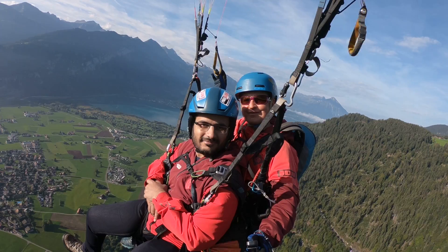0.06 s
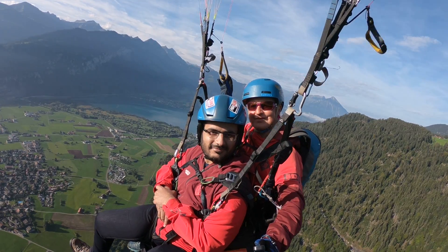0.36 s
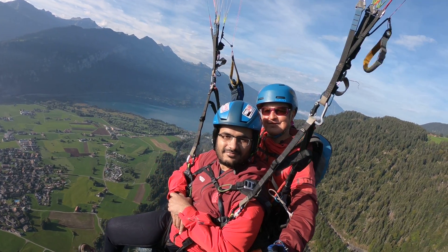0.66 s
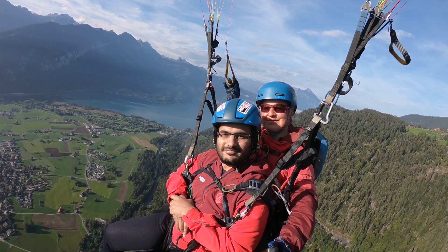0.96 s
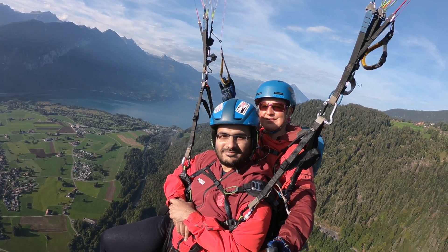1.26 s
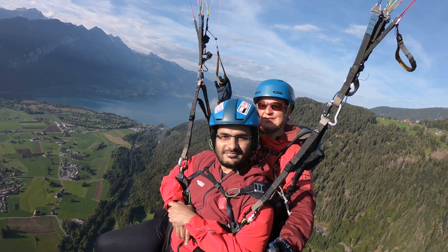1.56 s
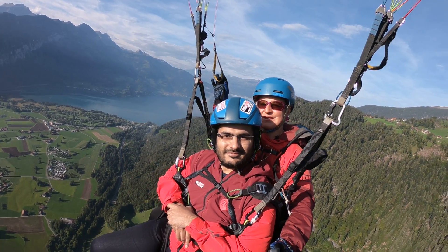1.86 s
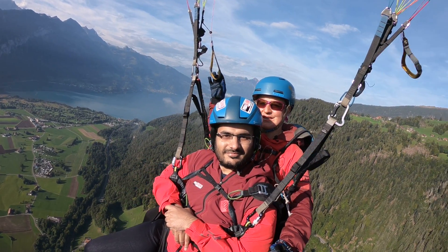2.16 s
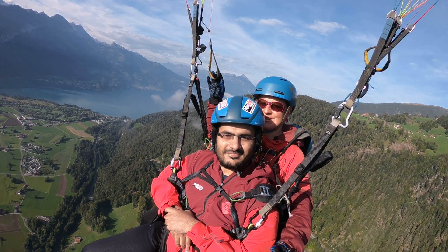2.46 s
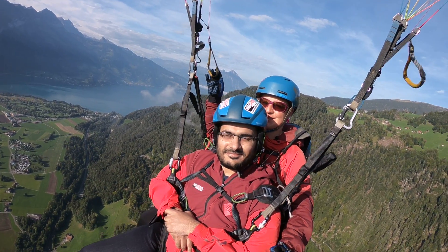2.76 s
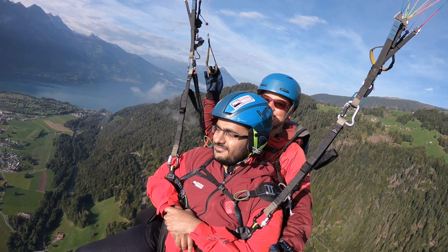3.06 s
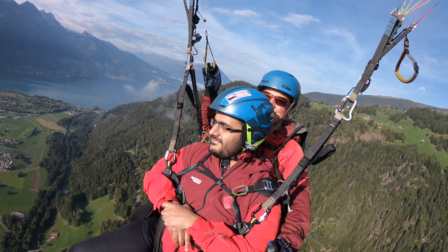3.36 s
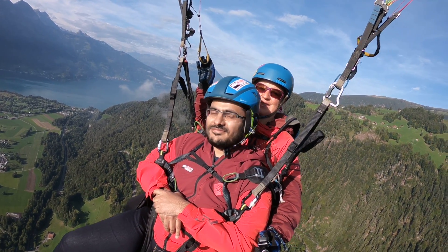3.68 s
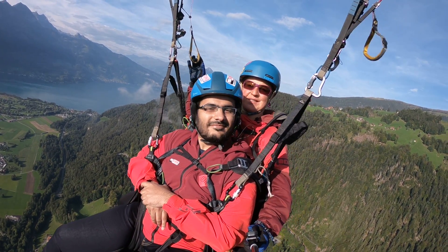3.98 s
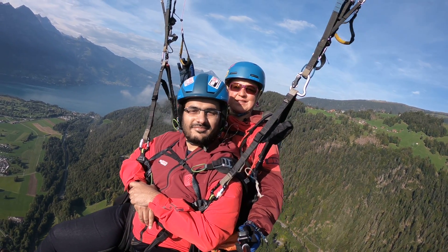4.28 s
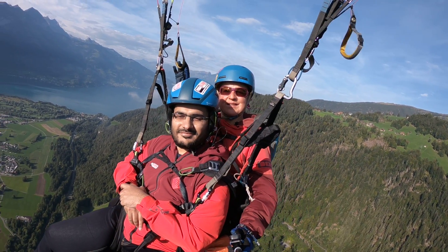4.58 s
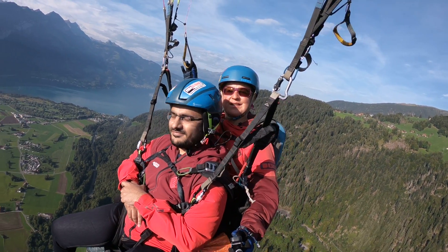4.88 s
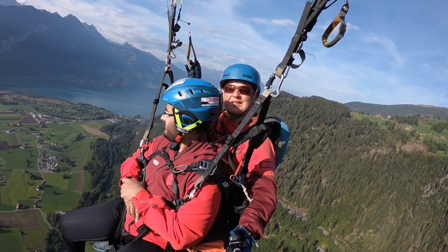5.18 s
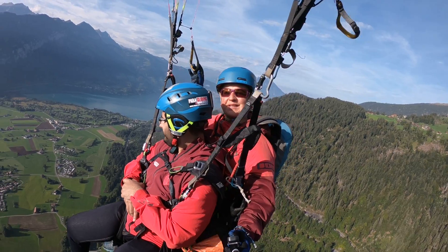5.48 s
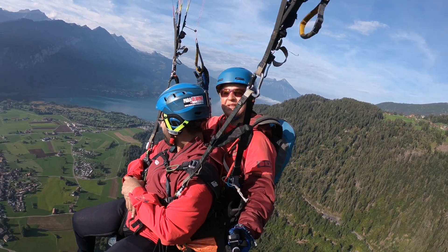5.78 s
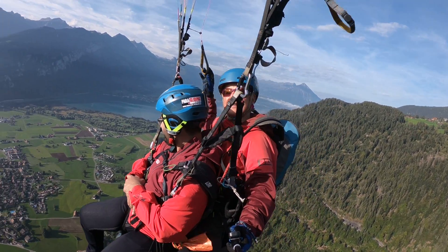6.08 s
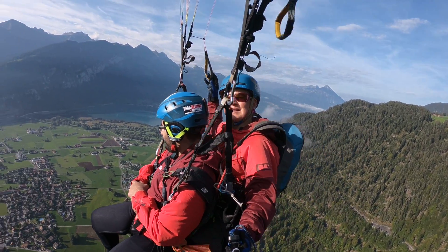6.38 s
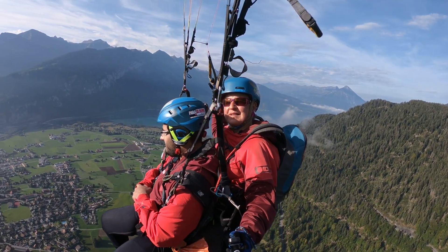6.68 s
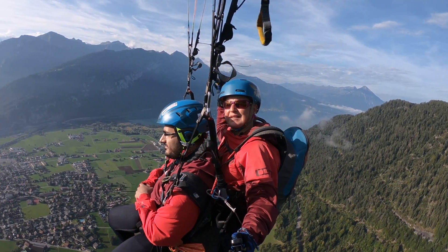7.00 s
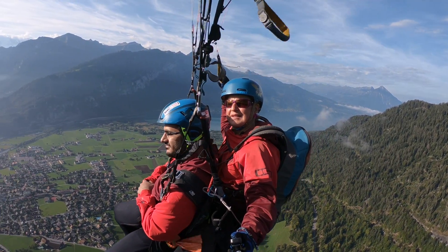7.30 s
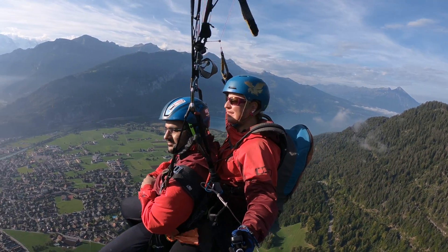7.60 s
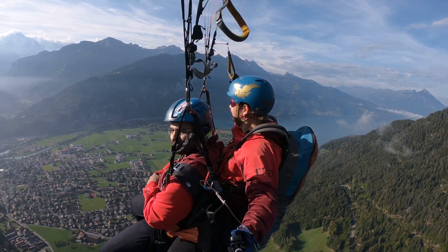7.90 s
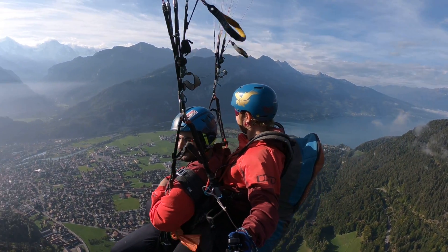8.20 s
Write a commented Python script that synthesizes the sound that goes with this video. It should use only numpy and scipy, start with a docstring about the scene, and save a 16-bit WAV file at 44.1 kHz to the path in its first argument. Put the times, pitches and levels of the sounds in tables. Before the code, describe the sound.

Wind fades in quickly and rumbles right on the microphone during a paraglider flight, with uneven thumps, little pops and a steady hiss behind. A few dry buckle ticks come near the start. Toward the end the deep buffeting weakens and gives way to a tearing, fizzing gust, mixed with short cloth scuffs and sharp fabric snaps.

```python
"""Low, buffeting wind fades in on the microphone of a camera held out from a paraglider, high above a valley.
Large eddies thump the housing and small ones flutter and pop at the port, over an even rush of air.
Harness buckles tick early on, and taut fabric gives the odd snap. Near six seconds the camera swings
round: a sleeve and the straps rub and snap, and the stream tears across the port in a bright,
crackling gust."""
import sys
import numpy as np
from scipy import signal
from scipy.fft import rfft, irfft, next_fast_len
from scipy.io import wavfile
from scipy.ndimage import uniform_filter1d

SR = 44100
rng = np.random.default_rng(int(sys.argv[2]) if len(sys.argv) > 2 else 0)


def pcm_store(signal):
    """Save signal as 16-bit PCM."""
    levels = np.round(np.clip(np.atleast_2d(signal), -1, 1) * 32767)
    wavfile.write(sys.argv[1], SR, levels.astype(np.int16).T)


N = 372644
TIME, BINS = np.arange(N) / SR, np.fft.rfftfreq(next_fast_len(N), 1 / SR)
TURN_S, TURN_LENGTH_S = 6.0, 0.34  # the camera swings round


def gain_of(db):
    """Decibels to amplitude."""
    return 10 ** (np.asarray(db) / 20)


def unit_rms(x):
    """Scales to rms 1."""
    return x / np.sqrt(np.mean(x ** 2) + 1e-20)


def follow(rows):
    """Each column of an automation curve, sample by sample."""
    s, *columns = np.transpose(rows)
    return [np.interp(TIME, s, column) for column in columns]


def coloured(x, colour):
    """Puts x through an EQ curve, at rms 1."""
    hz, db = np.transpose(colour)
    size = next_fast_len(N)
    eq = gain_of(np.interp(np.log(BINS + 1), np.log(hz), db))
    return unit_rms(irfft(rfft(x, size) * eq, size)[:N])


def wander(rate_hz, size=16384):
    """Random drift of rms 1, mostly slower than the rate, with its extremes rounded off."""
    hz = np.fft.rfftfreq(size, TIME[-1] / size)
    band = hz / (hz + 3) / (1 + (hz / rate_hz) ** 2)
    drift = unit_rms(irfft(rfft(rng.standard_normal(size)) * band))
    return np.interp(TIME, np.linspace(0, TIME[-1], size), unit_rms(np.tanh(drift / 2)))


def turbulence(colour, surge_db):
    """Random pressure that comes in surges, shaped by an EQ curve."""
    return coloured(rng.standard_normal(N) * gain_of(surge_db), colour)


def swell(s, half_s):
    """The samples around a moment, and a bell that peaks there."""
    near = slice(*np.searchsorted(TIME, [s - .1, s + .1]))
    return near, np.exp(-((TIME[near] - s) / half_s) ** 2)


def ride_level(x, level_db, buffet_power):
    """Keeps the quick lumps of x around a level, and gives each buffet its full strength."""
    slow_power = uniform_filter1d(uniform_filter1d(x ** 2, size=5000), size=3500) + 1e-12
    quick_power = uniform_filter1d(uniform_filter1d(x ** 2, size=1100), size=750) + 1e-12
    return x * np.sqrt(gain_of(level_db) ** 2 / slow_power + buffet_power / quick_power)


# throb of vortices behind the camera and its pole: t/s, f/Hz, share of the rumble's power/0-1
SHEDDING = [(.4, 165, 0.2), (1.4, 68, 0.05), (2.1, 120, 0.2), (2.65, 121.9, 0.25), (3.0, 61.92, 0.34),
            (3.9, 55.99, 0.25), (4.35, 100, 0.6), (4.75, 100, 0.22), (5.4, 148.1, 0.13), (6.15, 104, 0.56),
            (6.55, 122, 0.26), (6.8, 115, .5), (6.9, 102, .75), (7.18, 95.8, .8), (7.3, 111.9, 0.01),
            (7.8, 250, 0), (7.9, 280, .35), (8.25, 280.4, 0.22), (8.45, 301, 0)]


def vortex_throb(width_hz=20):
    """Vortices peel off almost regularly: narrow noise at the shedding rate, and its share of power."""
    hz, share = follow(SHEDDING)
    pole = np.exp(-2 * np.pi * width_hz / SR)
    noise = rng.standard_normal(N) + 1j * rng.standard_normal(N)
    drift = signal.lfilter([1], np.poly([pole, pole]), noise)
    carrier = np.exp(2j * np.pi * np.cumsum(hz) / SR)
    return unit_rms((drift * carrier).real), np.clip(share, 0, 1)


# faders for three sizes of eddy: t/s, rumble/dB, flutter/dB, swirl/dB
EDDY_LEVELS = [(0.33, -30.3, -32.5, -46.5), (0.9, -28, -35, -43), (1.4, -24, -35, -47),
               (1.9, -24, -39.5, -49), (2.9, -27, -39.5, -52.3), (3.45, -27, -41, -54),
               (3.65, -29, -38.5, -54), (4.4, -29, -43, -51), (4.6, -24.5, -38.5, -49.5),
               (5.3, -30.5, -34, -42.5), (5.7, -33.5, -34, -44.5), (5.95, -29.5, -35, -43),
               (6.15, -28, -34.5, -42.5), (6.4, -33, -39, -46), (6.7, -35.5, -37, -44.5),
               (6.92, -35.5, -43.5, -46.5), (7.12, -36, -43.5, -47), (7.25, -36, -40, -47.5),
               (7.45, -37.5, -41, -50), (7.62, -39, -45, -50), (7.8, -37.5, -44.5, -50.5),
               (7.87, -39, -39.5, -46), (8.05, -37, -38.3, -44.5), (8.25, -39, -41, -46),
               (8.45, -42, -47, -48.5)]
# single large eddies thump the housing: t/s, rumble/dB, flutter/dB
BUFFETS = [(.716, -23.5, -35), (.849, -29, -30), (.918, -29, -45), (1.133, -23, -43), (1.198, -22, -41),
           (1.259, -21, -35), (1.391, -29, -39), (1.438, -36, -31), (1.474, -17.5, -40), (1.6, -22.5, -36),
           (1.658, -21.5, -42), (1.777, -19, -37), (1.852, -22, -38), (1.94, -30, -31.5), (1.976, -21, -41),
           (2.022, -21, -36), (2.119, -20, -42), (2.196, -27, -31), (2.281, -19.5, -38), (2.348, -31, -42),
           (2.388, -21.5, -36), (2.446, -18.5, -37), (2.557, -23.5, -34), (2.6, -25, -39),
           (2.652, -19, -29.5), (2.672, -23, -26), (2.717, -26, -38), (2.761, -24, -48),
           (2.832, -27, -32.5), (2.874, -27, -48), (2.946, -20.5, -41), (2.996, -21.5, -32),
           (3.063, -24, -48), (3.119, -26.5, -37), (3.213, -21, -43), (3.269, -24, -44), (3.306, -25, -39),
           (3.378, -25, -34.5), (3.42, -29, -30.5), (3.455, -22, -29.5), (3.521, -20.5, -36),
           (3.72, -24.5, -31.5), (3.79, -39, -31.5), (3.884, -24, -32.5), (3.973, -28.5, -37),
           (4.156, -27.5, -48), (4.209, -24, -44), (4.254, -29, -47), (4.33, -32, -31.5),
           (4.527, -20.5, -40), (4.585, -23, -37), (4.789, -28.5, -38), (4.932, -23.5, -45),
           (4.98, -30.5, -30.5), (5.125, -43, -28), (6.197, -28, -28), (6.52, -31, -39), (6.595, -31, -42),
           (6.785, -28, -36), (6.895, -29, -48), (6.92, -26.5, -52), (6.965, -29.5, -52),
           (7.09, -30.5, -52), (7.14, -31, -52), (7.172, -28.5, -50), (7.87, -36, -40)]
# the air falls slack between buffets: t/s, dip/dB
LULLS = [(1.353, -3), (1.412, -6), (2.088, -4), (2.167, -6), (2.259, -9), (2.49, -7), (2.74, -5), (2.8, -6),
         (2.895, -5), (2.92, -4), (3.097, -4), (3.187, -7.5), (3.33, -9), (3.6, -5.5), (3.837, -7),
         (4.105, -3), (4.178, -8), (4.373, -6.5), (4.45, -2), (4.505, -7), (6.745, -2), (7.005, -2),
         (7.045, 0), (7.21, -4)]
# deep body of the large eddies: f/Hz, level/dB
RUMBLE_EQ = [(10, -18), (25, -10.5), (45, -4), (60, -0.5), (78, -2.5), (102, -1), (135, -2.5), (180, -7),
             (260, -15), (500, -39), (1200, -85)]
# low-mid flap of the small eddies: f/Hz, level/dB
FLUTTER_EQ = [(60, -24.5), (155, -4), (230, -2), (305, 0.5), (370, -6), (480, -13.5), (620, -17),
              (850, -30), (1500, -46), (4000, -81.5)]


def buffeting(surge, rumble_trim_db=1.27, flutter_trim_db=1.86):
    """Large eddies shake the housing, with thumps and lulls; the small ones they shed flutter along."""
    rumble_db, flutter_db, _ = follow(EDDY_LEVELS)
    slack_db, thuds, flaps = np.zeros((3, N))
    for s, dip_db in LULLS:
        near, bell = swell(s, half_s=.011)
        slack_db[near] += dip_db * bell
    for s, thud_db, flap_db in BUFFETS:
        near, bell = swell(s, half_s=.015)
        thuds[near] += bell * gain_of(thud_db) ** 2
        flaps[near] += bell * gain_of(flap_db) ** 2
    vortices, share = vortex_throb()
    throb = unit_rms(vortices * gain_of(1.5 * surge))
    rumble = np.sqrt(1 - share) * turbulence(RUMBLE_EQ, surge_db=2 * surge) + np.sqrt(share) * throb
    flutter = turbulence(FLUTTER_EQ, surge_db=1.5 * surge)
    return (ride_level(rumble, rumble_db + rumble_trim_db + slack_db, thuds)
            + ride_level(flutter, flutter_db + flutter_trim_db + slack_db, flaps))


# midrange sputter at the port: f/Hz, level/dB
SWIRL_EQ = [(200, -18.5), (420, 1), (560, -1.5), (720, -4), (880, -8), (1250, -13.5), (1650, -23),
            (2300, -23), (4000, -36.5), (8000, -71)]


def swirl(surge, trim_db=2.5, surge_db=2.0, sputter_db=1.64):
    """The smallest eddies sputter at the rim of the port."""
    _, _, level_db = follow(EDDY_LEVELS)
    flicker_db = surge_db * surge + sputter_db * wander(rate_hz=160)
    return gain_of(level_db + trim_db) * turbulence(SWIRL_EQ, flicker_db)


# fader for the air around the housing: t/s, level/dB
WHOOSH_LEVEL = [(.33, -56.5), (1.2, -58), (1.55, -52.5), (4.4, -51), (4.85, -45.5), (5.5, -52.5),
                (5.95, -47.5), (6.06, -40.5), (6.45, -47), (7.25, -46), (7.5, -51), (8.0, -47.5),
                (8.45, -62)]
# its hollow tone: f/Hz, level/dB
WHOOSH_EQ = [(500, -19.5), (850, -5.5), (1000, -0.5), (1280, -1), (1600, -4.5), (2100, -10.5),
             (3000, -20.5), (6000, -56.5)]


def whoosh(surge, trim_db=0.73, surge_db=0.9, grain_db=1.5):
    """Air parts around the housing: a steadier, hollow band that swells as the camera swings round."""
    level_db, = follow(WHOOSH_LEVEL)
    flicker_db = surge_db * surge + grain_db * wander(rate_hz=340)
    return gain_of(level_db + trim_db) * turbulence(WHOOSH_EQ, flicker_db)


# fader for the bed of rushing air: t/s, level/dB
RUSH_LEVEL = [(.33, -56.8), (1.1, -57.3), (2.9, -55.7), (5.5, -57.5), (6.0, -54.5), (8.45, -62)]
# its broad hiss: f/Hz, level/dB
RUSH_EQ = [(500, -5.5), (1200, -2), (1800, -4), (2400, -0.5), (3200, -3), (4000, -2.5), (4700, -6),
           (5700, -8.5), (6500, -14), (7500, -22.5), (8500, -38), (9600, -60)]


def rush(surge, trim_db=2.5, surge_db=.5, grain_db=1.0):
    """Air streams past the lines and the harness: a nearly even hiss."""
    level_db, = follow(RUSH_LEVEL)
    flicker_db = surge_db * surge + grain_db * wander(rate_hz=250)
    return gain_of(level_db + trim_db) * turbulence(RUSH_EQ, flicker_db)


# harness buckles tick: t/s, level/dB, tilt/dB per octave
BUCKLE_TICKS = [(.509, -35.5, -1), (.512, -37, 0.5), (.837, -38, -1), (0.9424, -31, -1), (.961, -40, 0),
                (.979, -31, -.5), (1.191, -35.5, -3), (1.310, -32.5, -2.5), (1.424, -38, 3),
                (1.430, -42, 1)]
# their dry, midrange body: f/Hz, level/dB
BUCKLE_EQ = [(250, -17), (650, 0), (1200, -1.5), (1700, -6), (2600, -9), (3300, -16), (4000, -32),
             (7000, -58)]


def buckles(level_window_s=.002, lag_s_per_octave=.0005, size=2048):
    """A buckle ticks without ringing: one broad pulse whose treble arrives just ahead of its body."""
    out = np.zeros(N)
    hz = np.fft.rfftfreq(size, 1 / SR) + 1
    octaves = np.log2(hz / 1000)
    eq_hz, eq_db = np.transpose(BUCKLE_EQ)
    body_db = np.interp(np.log(hz), np.log(eq_hz), eq_db)
    smear = np.exp(2j * np.pi * np.cumsum(octaves * lag_s_per_octave) * SR / size)
    for s, db, tilt_db in BUCKLE_TICKS:
        pulse = np.fft.fftshift(irfft(smear * gain_of(body_db + tilt_db * octaves)))
        pulse *= np.sqrt(level_window_s * SR) / np.linalg.norm(pulse)
        first = round(s * SR) - size // 2
        out[first:first + size] += gain_of(db) * pulse
    return out


def rustles(rows, trim_db, grain_db, top_hz=6500):
    """Each rustle is a band of gritty noise that swells and fades."""
    out, t = np.zeros(N), np.arange(-8192, 8192) / SR
    bins = np.fft.rfftfreq(len(t), 1 / SR) + 1
    for s, db, hz, half_s, octaves in rows:
        band = np.exp(-.5 * (np.log2(bins / hz) / octaves) ** 2) / (1 + (bins / top_hz) ** 10)
        grit = gain_of(grain_db * unit_rms(uniform_filter1d(rng.standard_normal(len(t)), size=60)))
        bell = np.exp(-.5 * (t / half_s) ** 2)
        stroke = irfft(rfft(rng.standard_normal(len(t)) * grit * bell) * band)
        stroke *= np.linalg.norm(bell) / np.linalg.norm(stroke)
        first = round((s + t[0]) * SR)
        out[first:first + len(t)] += gain_of(db + trim_db) * stroke
    return out


# single eddies burst on the port: t/s, level/dB, f/Hz, half length/s
EDDY_POPS = [(.512, -28.5, 682, .002), (.652, -22, 580, 0.0026), (.699, -28, 580, 0.0018),
             (.838, -23.5, 619, 0.0027), (0.844, -28, 1045, .0013), (.860, -29.5, 910, .0018),
             (.950, -30, 790, .002), (0.977, -26, 950, .0014), (1.062, -27, 880, 0.0027),
             (1.1, -33, 946, .0018), (1.189, -29, 818, .0014), (1.232, -31, 800, 0.0016),
             (2.098, -32, 948, 0.0021), (2.650, -28.5, 480, .0025), (2.719, -32, 562, .0018),
             (2.997, -30.5, 690, 0.0018), (3.378, -30, 528, .0029), (3.441, -31, 620, .002),
             (5.618, -32, 715, .0017), (5.645, -25.5, 791, .0022), (5.797, -30, 770, 0.0014),
             (5.914, -27, 696, 0.0036), (6.012, -24, 903, 0.0023)]


def pops(trim_db=-2.2, glide_octaves=0.596, wake_stretch=1.8, wake_octaves=.6):
    """An eddy crosses the port as a few quickening swings of pressure, in a wake of torn air."""
    chirps = np.zeros(N)
    for (s, db, hz, half_s), phase in zip(EDDY_POPS, rng.random(len(EDDY_POPS))):
        near = slice(*np.searchsorted(TIME, [s - .02, s + .02]))
        passage = 2 * (TIME[near] - s) / half_s
        cycles = np.cumsum(hz * 2 ** (glide_octaves * np.tanh(passage))) / SR
        chirps[near] += gain_of(db + trim_db) / np.cosh(passage) * np.sin(2 * np.pi * (cycles + phase))
    wakes = [(s, db, hz, half_s * wake_stretch, wake_octaves) for s, db, hz, half_s in EDDY_POPS]
    return chirps + rustles(wakes, trim_db=-15.0, grain_db=2.5)


# sharp snaps of fabric, crowding in after the turn: t/s, level/dB, f/Hz
FABRIC_SNAPS = [(1.932, -46, 2300), (2.222, -47, 4800), (2.812, -43, 2900), (4.93, -47, 2300),
                (5.132, -46, 2200), (6.0284, -41, 3100), (6.072, -43, 4500), (6.2864, -45, 3800),
                (6.2905, -37, 5050), (6.375, -43, 5000), (6.452, -40.5, 5200), (6.514, -44, 5300),
                (6.625, -44, 4700), (6.859, -45, 4100), (6.9097, -40, 3900), (6.971, -46, 3600),
                (7.026, -49, 4000), (7.043, -44, 4900), (7.185, -39.5, 4300), (7.249, -47, 3500),
                (7.285, -45, 3800), (7.32, -43, 3400), (7.3267, -41, 3800), (7.418, -46, 3600),
                (7.477, -39, 3300), (7.487, -46, 5400), (7.5115, -40, 5000), (7.537, -39, 3600),
                (7.556, -44, 4900), (7.579, -46, 3870), (7.658, -48, 3700), (7.725, -43, 3300),
                (7.731, -44, 3300), (7.7385, -41, 3500), (7.7636, -39.5, 3190), (7.809, -45, 4800),
                (7.902, -43, 5100), (7.918, -45, 5100), (7.933, -44, 4900)]


def snaps(half_s=0.00084, width_octaves=0.36):
    """Taut fabric snaps: a very short, bright crack of noise."""
    return rustles([(*snap, half_s, width_octaves) for snap in FABRIC_SNAPS], trim_db=1.0, grain_db=2.0)


# strokes of cloth: t/s, level/dB, f/Hz, half length/s, width/octaves
CLOTH_RUBS = [(5.905, -41, 700, .022, .45), (5.998, -39.5, 750, .01, .5), (6.012, -32.5, 1500, .002, 0.66),
              (6.0265, -30.5, 1350, .0035, 0.74), (6.044, -36, 1250, .011, .75),
              (6.082, -35.5, 1750, .013, 0.73), (6.105, -41, 1050, .008, .6),
              (6.14, -40, 2400, 0.0041, 0.37), (6.595, -42, 1700, 0.023, 0.98),
              (6.632, -39.5, 1750, 0.016, .7), (6.715, -40, 2200, 0.044, 0.7),
              (6.792, -41, 2000, 0.016, 0.86), (7.075, -40, 1400, 0.0077, 0.45),
              (7.222, -43, 1400, .018, .4), (7.32, -47, 1500, .015, 0.53), (7.645, -48.5, 3400, 0.017, .35)]


def rubs():
    """A sleeve and the straps rub as the camera is swung round: short, gritty scuffs."""
    return rustles(CLOTH_RUBS, trim_db=-1.0, grain_db=3.2)


def below_edge(x, edge_hz, drop_db, width_hz=350):
    """A moving high shelf: lowers all that lies above the edge."""
    hz, s, spectrum = signal.stft(x, SR, nperseg=256)
    above = .5 + .5 * np.tanh((hz[:, None] - np.interp(s, TIME, edge_hz)) / width_hz)
    _, shelved = signal.istft(spectrum * gain_of(-drop_db * above), SR, nperseg=256)
    return unit_rms(shelved[:N])


def crackle(colour, per_s, spread_db):
    """Tiny breaks in the stream: sparse puffs of about a millisecond, mostly small, a few large."""
    strength = gain_of(spread_db * np.minimum(rng.exponential(1, N), 3))
    breaks = rng.random(N) < per_s / SR
    puffs = signal.oaconvolve(strength * breaks, signal.windows.hann(60), "same")
    return coloured(puffs * rng.standard_normal(N), colour)


# the gust; the top edge of its fizz follows its speed: t/s, roar/dB, fizz/dB, edge/Hz
GUST = [(6.01, -48, -74, 5600), (6.2, -43.5, -65, 5900), (6.42, -49, -54.5, 6200), (6.54, -47, -53, 6200),
        (6.7, -44.5, -51.5, 6130), (6.92, -51, -51.5, 5780), (7.15, -51.5, -57.5, 5250),
        (7.55, -49.5, -54.5, 4760), (7.75, -51, -60.5, 4700), (8.0, -51, -52, 5640),
        (8.25, -52.5, -53, 5820), (8.45, -54, -58, 5300)]
# tearing midrange: f/Hz, level/dB
ROAR_EQ = [(300, -16), (800, 5), (1100, -1), (1500, 0), (2200, 0.5), (3000, -5.5), (3800, -9), (5500, -21),
           (8000, -57)]
# sizzling top: f/Hz, level/dB
FIZZ_EQ = [(1200, -27), (2800, -12), (3800, -3.5), (5400, -0.5), (6500, -2), (7500, -8.5), (8500, -17),
           (9600, -37)]
# dense, papery crackle: f/Hz, level/dB
CRINKLE_EQ = [(600, -15.5), (1500, 0), (2500, -1), (3600, -1), (4500, 2.5), (5300, -14), (8000, -36.5)]
# sparser, needle-fine crackle: f/Hz, level/dB
PRICKLE_EQ = [(2500, -31), (4300, -8), (5200, 0), (6200, -4), (7300, -13.5), (8500, -24), (9600, -46.5)]


def gust(turned, roar_trim_db=3.5, fizz_trim_db=0.5, crinkle_db=-60, prickle_db=-62.5):
    """The stream breaks away from the port again and again: a tearing roar topped by crackling fizz."""
    roar_db, fizz_db, edge_hz = follow(GUST)
    attack = np.clip((TIME - GUST[0][0]) / .008 + 1, 0, 1)
    tear_db = 2 * wander(rate_hz=210) + wander(rate_hz=7.3)
    roar = gain_of(roar_db + roar_trim_db) * turbulence(ROAR_EQ, tear_db)
    fizz = below_edge(turbulence(FIZZ_EQ, tear_db), edge_hz, drop_db=9.5)
    fizz *= gain_of(fizz_db + fizz_trim_db)
    # the crackle keeps its level, so it stands out as the roar dies down
    crinkle = gain_of(crinkle_db) * crackle(CRINKLE_EQ, per_s=340, spread_db=4.0)
    prickle = gain_of(prickle_db) * crackle(PRICKLE_EQ, per_s=160, spread_db=5.5)
    return attack * (roar + fizz + crinkle) + turned * prickle


def scene(late_surge_depth=0.49):
    """The mono mix: one pattern of surges drives the wind bed and calms once the camera has turned."""
    turned = np.clip((TIME - TURN_S) / TURN_LENGTH_S, 0, 1)
    surge = wander(rate_hz=28) * (1 + (late_surge_depth - 1) * turned)
    wind_bed = buffeting(surge) + swirl(surge) + whoosh(surge) + rush(surge)
    return (wind_bed + gust(turned) + pops() + buckles() + rubs() + snaps())[None]


# master fader, opening quickly: t/s, gain/dB
FADE_IN = [(0, -81), (.222, -70), (.238, -31), (.265, -17.5), (.3, -7.5), (.34, -3)]


def record(dry, cutoff_hz=9600):
    """The fade-in, then a steep low-pass."""
    fade_db, = follow(FADE_IN)
    low_pass = signal.firwin(511, cutoff_hz, window=("kaiser", 9), fs=SR)
    return signal.oaconvolve(dry * gain_of(fade_db), low_pass[None], "same")


dry = scene()
out = record(dry)
pcm_store(out)
```